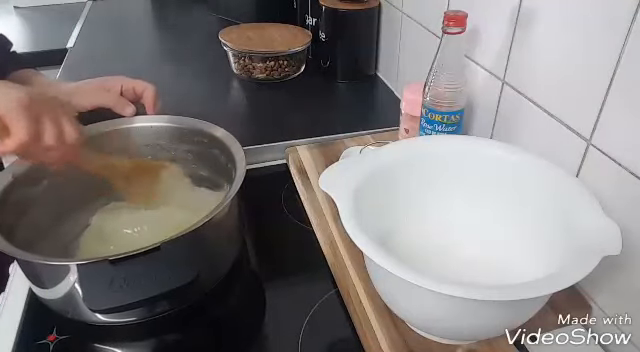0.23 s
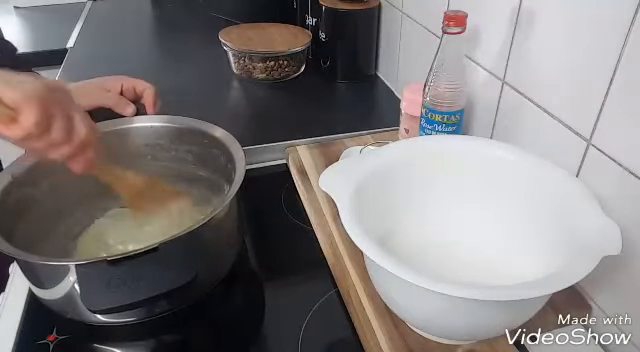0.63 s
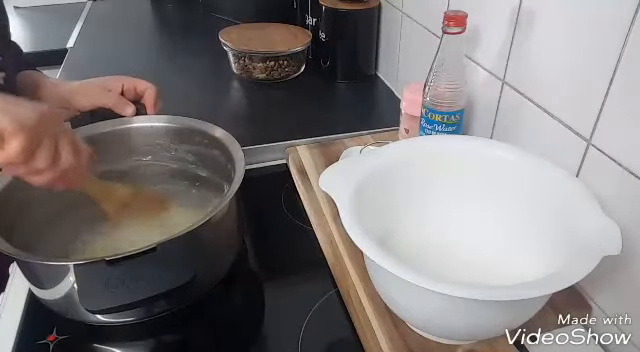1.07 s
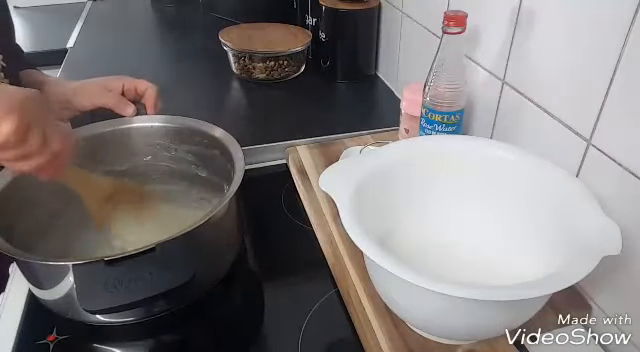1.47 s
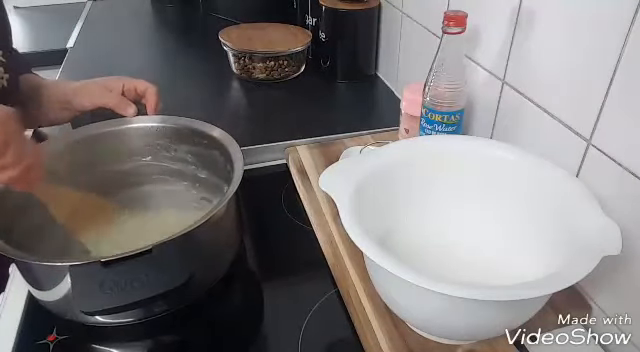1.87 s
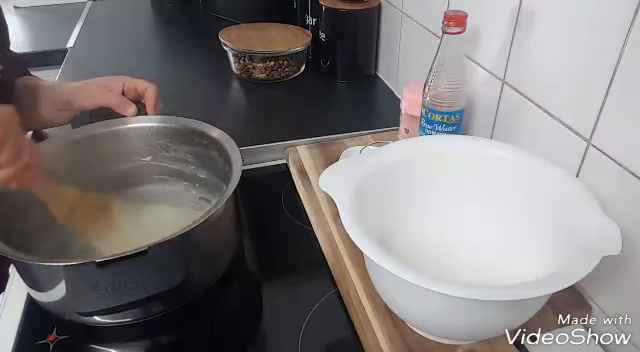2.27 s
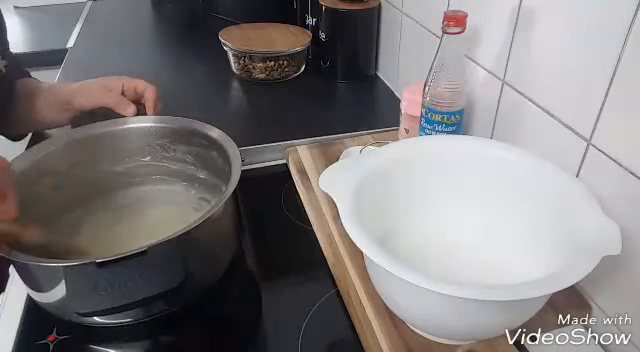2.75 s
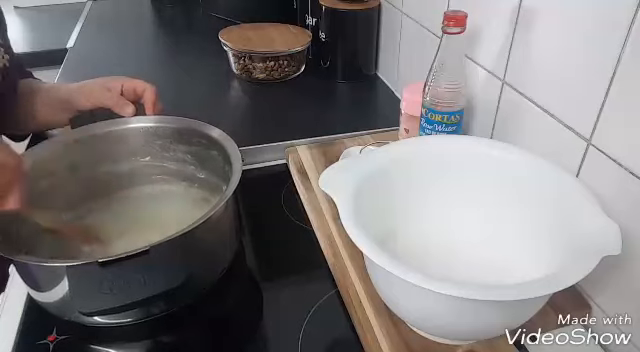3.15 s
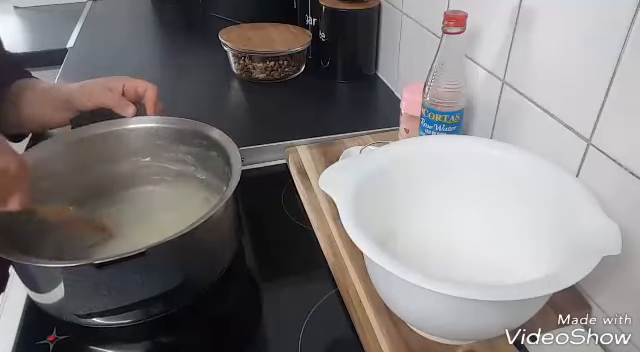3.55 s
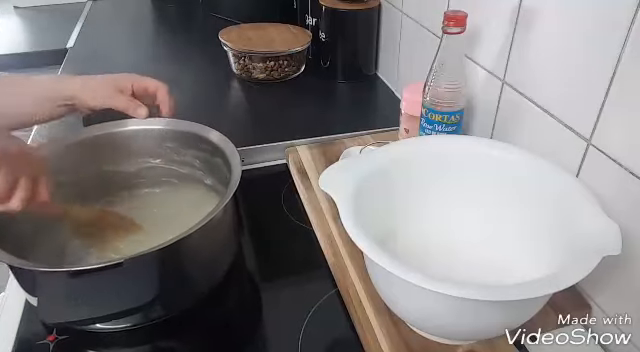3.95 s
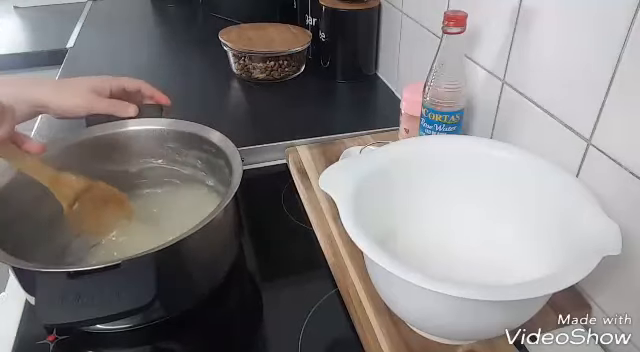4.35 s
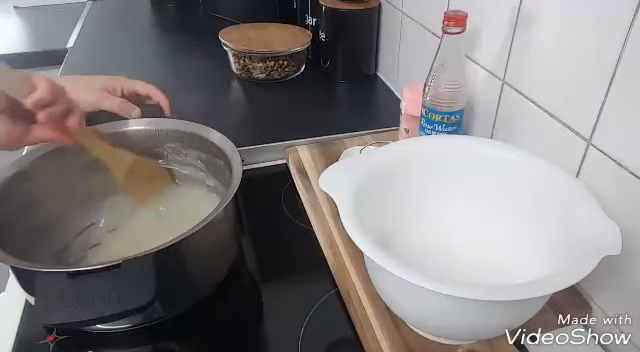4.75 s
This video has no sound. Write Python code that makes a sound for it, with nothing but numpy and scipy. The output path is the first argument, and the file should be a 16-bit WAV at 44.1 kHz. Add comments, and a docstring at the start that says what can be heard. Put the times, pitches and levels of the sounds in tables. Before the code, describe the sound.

Close stirring in a metal pot: one loud woody clank, then soft thuds, low rubbing and faint wet swishes in a tiled kitchen.

```python
"""A wooden spoon stirs a thin mixture in a steel pot on a hob, in a tiled kitchen, close to the microphone.
It knocks the wall once hard and twice softly, among fainter contacts: each blow sets off a sum of decaying modes.
Strokes round the bottom stick and slip, which drives the damped low modes; wood grates on steel as fine random slips.
The mixture swishes as dense coloured grains and smacks as short bands of noise.
The room adds a tail of decaying noise, over a low steady background."""
import sys
import numpy as np
from scipy import signal
from scipy.fft import rfft, irfft
from scipy.io import wavfile

SR = 44100
rng = np.random.default_rng(int(sys.argv[2]) if len(sys.argv) > 2 else 0)


def unload_audio(sound):
    """Save the sound as a 16-bit wav file, at the path given as the first command line argument."""
    columns = np.transpose(np.atleast_2d(sound))
    # keep every value between -1 and 1, then stretch to whole-number steps
    steps = np.round(np.clip(columns, -1, 1) * 32767)
    wavfile.write(sys.argv[1], SR, steps.astype(np.int16))


N = 221205
T = np.arange(N) / SR  # time through the scene, s
RING = T[:SR]  # time after a contact, s

# Stirring strokes, several a second; each presses harder until it bumps the wall, then eases.
# Each row: time of the bump in seconds, easing time in seconds, push in dB,
# grit in dB (how bare the steel is under the spoon).
STROKES = [(1.048, 0.095, -58, -8.5), (1.798, 0.028, -53.5, -5), (1.995, 0.03, -54.5, -7),
           (2.116, 0.059, -51, -14), (2.345, 0.024, -53.5, -4), (2.484, 0.03, -55, -13),
           (2.658, 0.034, -52.5, -9.5), (2.803, 0.027, -55, -36), (2.993, 0.029, -52.5, 0.5),
           (3.149, 0.23, -60, -26), (3.401, .04, -52, -4.5), (3.605, 0.041, -55.5, -24),
           (3.773, 0.069, -55.5, -15), (3.966, 0.13, -56.5, -2.5), (4.127, 0.015, -58.5, -6),
           (4.711, 0.11, -64.5, -45)]
# Sweeps of the blade through the mixture.
# Each row: start in seconds, length in seconds, swish in dB, grit in dB.
SWEEPS = [(0.0, 0.013, -70.5, 3), (0.124, 0.15, -73, 5), (0.54, 0.11, -66.5, 10.5),
          (0.981, 0.074, -66, 9.5), (1.408, 0.031, -66.5, 7.5), (1.742, 0.045, -65, -17),
          (2.084, 0.19, -66, 5), (2.729, 0.47, -65, -9), (3.258, 0.67, -69, 5), (3.568, 0.27, -59, -3.5),
          (3.787, 0.34, -60.5, -9), (4.044, 0.22, -62, -3), (4.264, 0.12, -66.5, 4.5),
          (4.434, 0.21, -75, 1.5), (4.694, 0.086, -73, -4), (4.883, 0.047, -70.5, -1)]


def undb(db):
    """Amplitude gain is ten to the power of a twentieth of the level in decibels."""
    return 10 ** (np.asarray(db) / 20)


def unit(x):
    """Normalisation: dividing by the root mean square gives unit power."""
    return x / np.sqrt(np.mean(x ** 2))


def fade(t60):
    """Exponential decay: the level falls by 60 dB in each t60 seconds."""
    return np.exp(-np.log(1000) * RING / t60)


def colour(x, points):
    """Spectral shaping: gains in dB, interpolated over log frequency, multiply the spectrum."""
    hz, db = np.transpose(points)
    f = np.fft.rfftfreq(x.shape[-1], 1 / SR)
    gain = undb(np.interp(np.log(f + 1), np.log(hz), db))
    return irfft(rfft(x) * gain, x.shape[-1])


def diffuse(size, apart_hz=330):
    """Diffuse field: noise alike left and right in the bass, unrelated in the treble."""
    mid, side = rfft(rng.standard_normal((2, size)))
    alike = 1 / (1 + (np.fft.rfftfreq(size, 1 / SR) / apart_hz) ** 2)
    mid = mid * np.sqrt(1 + alike)
    side = side * np.sqrt(1 - alike)
    return irfft(mid + np.array([side, -side]), size) / np.sqrt(2)


def soften(x, hz, order):
    """Low-pass filtering: a soft contact cannot push faster than about hz."""
    return signal.sosfilt(signal.butter(order, hz, fs=SR, output="sos"), x)


def band(x, hz, spread, order=2):
    """Band-pass filtering: keep hz / spread to hz * spread, below half the sample rate."""
    edges = [hz / spread, min(hz * spread, SR / 2 - 1)]
    return signal.sosfilt(signal.butter(order, edges, "band", fs=SR, output="sos"), x)


def add(out, s, x, db):
    """Superposition: add a sound at time s, with its own peak scaled to db."""
    i = int(s * SR)
    scaled = x * undb(db) / np.abs(x).max()
    out[:, i:i + x.shape[-1]] += scaled[..., :N - i]


def through(x, response):
    """Convolution: every sample of the signal sets off the whole response."""
    return signal.fftconvolve(np.atleast_2d(x), response, axes=-1)[:, :N]


def grains(rate, scatter_db):
    """Random impulse train: tiny slips, about rate a second, of very unequal size and either sign."""
    hit = rng.random(N) < rate / SR
    size = undb(scatter_db * np.minimum(rng.exponential(size=N), np.pi))
    return unit(hit * size * np.sign(rng.standard_normal(N)))


def background(level_db=-57):
    """Stationary diffuse noise: the low steady rumble and faint hiss of the room."""
    # Spectrum of the kitchen. Each row: frequency in Hz, relative density in dB per Hz.
    air = [(20, 15.5), (45, -69.5), (70, 2.5), (100, 5.5), (125, -7.5), (200, -0.5), (260, -10.5),
           (350, -4.5), (600, -11), (1100, -16), (2100, -22.5), (8500, -31), (10400, -32.5), (15000, -31)]
    return undb(level_db) * unit(colour(diffuse(N), air))


def sweep(s, length_s):
    """Speed envelope: the blade gathers speed, sags, then dies away exponentially."""
    attack_share, sag_db_per_s, release_s = 0.15, 26, 0.15
    age = np.maximum(T - s, 0)
    # a long sweep gathers speed more slowly
    attack = np.minimum(age / (attack_share * length_s), 1)
    sag = undb(-sag_db_per_s * age)
    release = np.exp(-np.maximum(age - length_s, 0) / release_s)
    return attack * sag * release


def uneven(rate_hz=22, depth_db=2):
    """Slow random modulation: the gain wavers as the hand-held spoon catches and slides."""
    return undb(depth_db * unit(soften(rng.standard_normal(N), rate_hz, order=2)))


def swish(level_db=2):
    """Granular noise: countless tiny films of liquid tear behind the spoon and scatter off the pot wall."""
    # Mixture swishing round the spoon. Each row: frequency in Hz, relative density in dB per Hz.
    swish_colour = [(800, 8), (2500, 7), (4200, 4.5), (6500, -0.5), (8600, 3.5), (10200, -4), (12500, -2),
                    (15500, -6)]
    fizz = np.array([grains(3500, 4.0) for _ in range(2)])  # independent left and right
    speed = np.max([undb(db) * sweep(s, length) for s, length, db, _ in SWEEPS], axis=0)
    return colour(fizz, swish_colour) * speed * uneven() * undb(level_db)


def pot_modes(lag_s=0.00014):
    """Modal decomposition: each mode of the filled pot rings alone, and the right channel leads the left."""
    # Filled pot: some modes ring on clearly, others die within a few hundredths of a second.
    # Each row: frequency in Hz, relative level in dB, 60 dB decay time in seconds.
    pot_table = [(96, -20, .6), (128, -14, .55), (285, -15, .22), (342, -14, .22), (413, -21, .35),
                 (516, -6, .15), (760, -20, .18), (863, -13, .16), (904, -16, .2), (955, -8, .25),
                 (1004, -17, .3), (1060, -6, .15), (1351, -11, .15), (1533, 2, .05), (1583, 0, .065),
                 (1945, -9, .1), (2105, -13, .15), (160, 4, .035), (195, 6, .045), (550, -2, .05),
                 (690, -7, .05), (1185, 0, .02), (2340, -7, .06), (2560, -21, .15), (3010, -14, .12),
                 (3430, -15, .08), (4350, -12, .07)]
    t = np.maximum(RING - np.array([[lag_s], [0]]), 0)
    modes = []
    for k, (hz, db, t60) in enumerate(sorted(pot_table)):
        # neighbouring modes push the air in opposite directions
        sign = (-1) ** k
        modes.append(sign * undb(db) * np.cos(2 * np.pi * hz * t) * fade(t60) * (t > 0))
    return np.array(modes)


def blow(modes, place_db=3.87, shell_db=1, shell_t60=0.1, jolt_db=12.0, jolt_s=0.00014, radiate_hz=80):
    """Impulse response: the wall jolts, then rings with a random mix of modes that stands for the place struck."""
    # Many weak, crowded modes of the pot. Each row: frequency in Hz, relative density in dB per Hz.
    shell = [(50, 7.5), (110, -3), (230, 1), (450, 1), (750, 6.5), (1500, 13.5), (2400, 13), (5000, 2.5),
             (15000, -60.5)]
    mix = undb(place_db * rng.standard_normal(len(modes)))
    ring = np.tensordot(mix, modes, axes=1)
    wash = undb(shell_db) * unit(colour(diffuse(SR), shell)) * fade(shell_t60)
    u = RING / jolt_s - np.pi
    jolt = undb(jolt_db) * u * np.exp((1 - u ** 2) / 2)  # one swing each way
    # a body this small radiates little bass
    return signal.sosfilt(signal.butter(2, radiate_hz, "high", fs=SR, output="sos"), jolt + ring + wash)


def press(s, ease_s, build_s=0.032):
    """Pressure envelope: a bell curve builds up to the bump of a stroke, then eases at its own pace."""
    return np.exp(-.5 * ((T - s) / np.where(T < s, build_s, ease_s)) ** 2)


def grating(pot, ring_db=-9, level_db=-2):
    """Friction-driven resonance: grains of wood crackle on steel, which rings faintly and sings during sweeps."""
    # Wet wood grating on steel. Each row: frequency in Hz, relative density in dB per Hz.
    grate_colour = [(250, -13), (600, 4.5), (1100, -6), (1800, -3), (2500, -6.5), (3400, -19), (6000, -35)]
    sing_hz, sing_t60_s, sing_db = 2520, 0.048, -12  # the wall mode that a sweeping edge keeps ringing
    pressed = sum(undb(db + grit) * press(s, ease) for s, ease, db, grit in STROKES)
    swept = uneven() * sum(undb(db + grit) * sweep(s, length) for s, length, db, grit in SWEEPS)
    slips = grains(700, 3.4) * np.hypot(pressed, swept)
    crackle = 2 * colour(slips, grate_colour)

    upper = band(pot, 2880, 1.75)
    ring = through(slips, upper / np.sqrt(np.sum(upper ** 2) / 2))

    mode = np.sin(2 * np.pi * sing_hz * RING) * fade(sing_t60_s)
    sing = through(grains(830, 1.6) * swept, [mode / np.linalg.norm(mode)])
    return (crackle + undb(ring_db) * ring + undb(sing_db) * sing) * undb(level_db)


def smacks(spread=1.26):
    """Decaying band noise: short wet bursts where the mixture slaps or lets go."""
    # Wet smacks. Each row: start in seconds, peak in dB before the room, centre in Hz,
    # 60 dB decay time in seconds.
    smack_table = [(0.09, -41, 3860, 0.058), (0.287, -55, 4380, 0.11), (0.549, -44.5, 3530, 0.19),
                   (0.868, -54, 4300, 0.039), (0.9831, -43.5, 5000, .045), (1.056, -50, 7240, 0.068),
                   (1.347, -48.5, 5660, 0.067), (1.448, -42.5, 2540, 0.25), (1.755, -49.5, 7900, 0.076),
                   (2.1058, -50.5, 6300, .055), (2.7609, -41, 4270, 0.042), (2.801, -51.5, 5700, 0.55)]
    out = np.zeros((2, N))
    for s, db, hz, t60 in smack_table:
        burst = band(diffuse(SR) * fade(t60), hz, spread, order=1)
        add(out, s, burst, db)
    return out


def ticks(modes, spread=1.45):
    """Contact duration: light, quick touches of the spoon's edge wake mainly a band of the pot's response."""
    # Clips of the edge on steel. Each row: start in seconds, level in dB, centre in Hz.
    tick_table = [(0.0918, -40, 1710), (2.016, -47, 2400), (2.33, -47.5, 2030), (2.708, -53, 1920),
                  (3.2864, -50, 2240), (3.442, -43.5, 1400), (3.963, -43.5, 2090), (4.078, -34.5, 3900),
                  (4.085, -41, 2420), (4.2152, -52, 1780)]
    out = np.zeros((2, N))
    for s, db, hz in tick_table:
        add(out, s, band(blow(modes, shell_db=-2), hz, spread), db)
    return out


def knocks(modes, wood_hz=2100, click_db=-36):
    """Impact filtering: wood rounds each blow and bump, and the mixture cushions most to a dull thud."""
    # Separate blows on the pot. Each row: start in seconds, level in dB,
    # highest pitch that the contact excites in Hz (a low-pass corner).
    knock_table = [(0.131, -47.5, 189), (0.5486, -10.5, 2350), (0.9828, -25, 490), (1.067, -34.5, 540),
                   (1.3482, -27, 538), (1.715, -37, 219), (2.465, -41, 295), (2.504, -48, 905),
                   (2.674, -38, 2270), (4.082, -40, 1530)]
    bump_db, bump_hz = 10.5, 376  # level of each stroke's bump above its push; its low-pass corner
    # the hob under the pot booms with each blow; level against the blow before cushioning is allowed for
    hob_hz, hob_t60_s, hob_db = 89.2, 0.63, -18.5
    hob_max_hz = 910  # only cushioned blows press long enough to move it much

    out = np.zeros((2, N))
    bumps = [(s, db + bump_db, bump_hz) for s, _, db, _ in STROKES]
    boom = soften(np.sin(2 * np.pi * hob_hz * RING) * fade(hob_t60_s), 2 * hob_hz, order=2)
    for s, db, hz in knock_table + bumps:
        pot = blow(modes)
        thud = soften(soften(pot, wood_hz, order=6), hz, order=4)
        click = undb(click_db) * soften(pot, 2700, order=2)
        add(out, s, thud + click, db)
        hob_loss_db = 20 * np.log10(1 + (hz / hob_max_hz) ** 2)
        add(out, s, boom, db + hob_db - hob_loss_db)
    return out


def judder(pot, slip_rate=500, scatter_db=3, level_db=-1.5, held_t60=0.15):
    """Stick-slip friction: the spoon pressed on the bottom shakes the low modes and damps their ring."""
    # The mixture cushions each slip, so the drag is mostly bass.
    # Each row: frequency in Hz, gain in dB.
    drag_colour = [(60, 24.5), (125, 10.5), (220, 5.5), (400, 2), (1200, 2.5)]
    judder_hz, grit_db_per_octave = 766, 41  # the judder reaches higher on barer steel
    slips = colour(grains(slip_rate, scatter_db), drag_colour)
    force = np.zeros(N)
    for s, ease, db, grit in STROKES:
        reach_hz = judder_hz * 2 ** (grit / grit_db_per_octave)
        force += undb(db) * press(s, ease) * soften(slips, reach_hz, order=3)
    held = pot * fade(held_t60)
    body = soften(held, 1210, order=2)
    # scaled so that the low modes have unit energy
    return through(force, held / np.sqrt(np.sum(body ** 2) / 2)) * undb(level_db)


def kitchen(x, build_s=0.0032):
    """Reverberation: tiles and worktop return a dense tail that builds up quickly; the bass stays longest."""
    # Each row: frequency in Hz, 60 dB decay time in seconds, level in dB against the direct sound.
    room = [(93.5, 0.69, -0.5), (205, 0.52, -8.5), (516, 0.45, -4), (1300, 0.53, -6), (2850, 0.39, -6),
            (11700, 0.29, -3.5)]
    hz, t60, db = np.transpose(room)
    noise, tail = diffuse(SR), 0
    for centre in 62.5 * 2 ** np.arange(9):  # octave bands
        decay = np.interp(np.log(centre), np.log(hz), t60)
        wet_db = np.interp(np.log(centre), np.log(hz), db)
        shape = fade(decay) * (1 - np.exp(-RING / build_s))
        shape = shape / np.sqrt(np.sum(shape ** 2))
        tail = tail + undb(wet_db) * band(noise, centre, np.sqrt(2), order=3) * shape
    return x + through(x, tail)


def scene():
    """Superposition and level panning: the pot stands a little to the left, and the room rings with all of it."""
    modes = pot_modes()
    struck = knocks(modes) + ticks(modes) + judder(blow(modes)) + grating(blow(modes))
    left_db = .9
    placed = struck * undb([[left_db], [-left_db]])
    return kitchen(placed + swish() + smacks()) + background()


def record(dry):
    """Band limiting: the microphone thins the deep bass and cuts the top."""
    top_hz = 15750
    thin = signal.sosfilt(signal.butter(2, 35, "high", fs=SR, output="sos"), dry)
    return signal.sosfilt(signal.ellip(10, .2, 70, top_hz, fs=SR, output="sos"), thin)


dry = scene()
out = record(dry)
unload_audio(out)
```